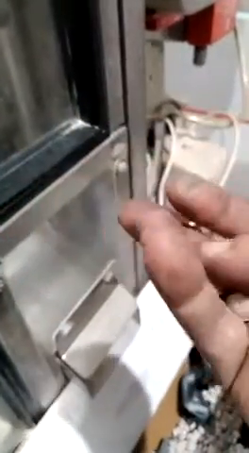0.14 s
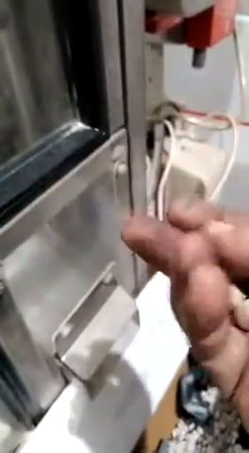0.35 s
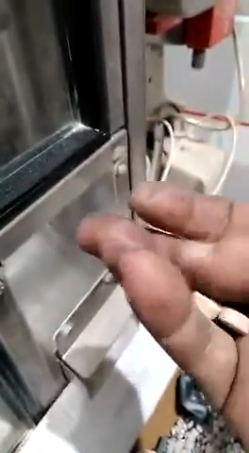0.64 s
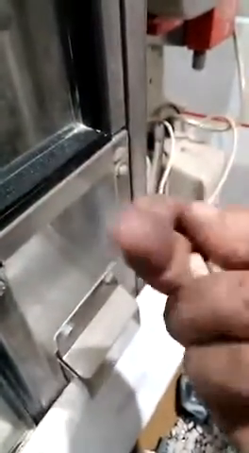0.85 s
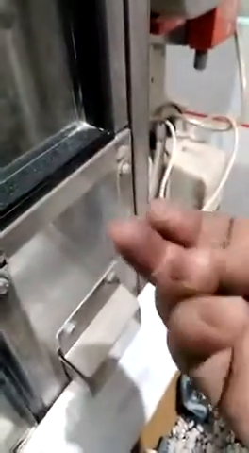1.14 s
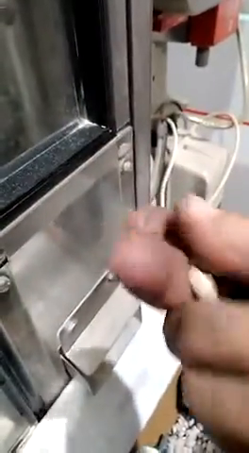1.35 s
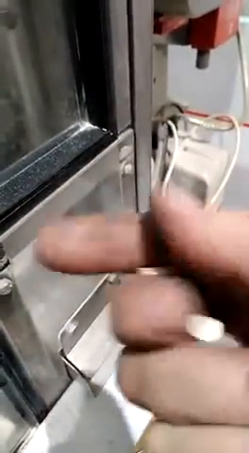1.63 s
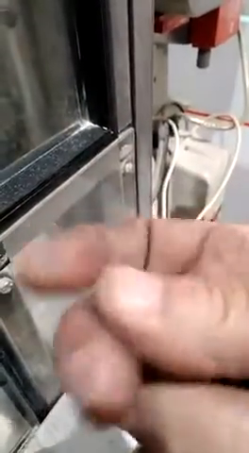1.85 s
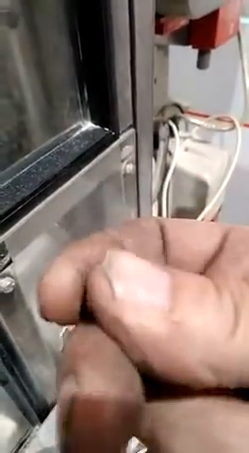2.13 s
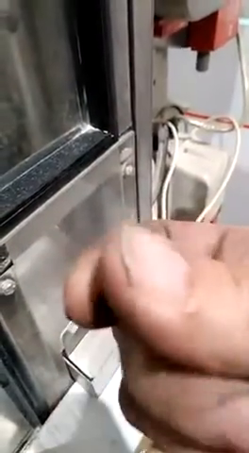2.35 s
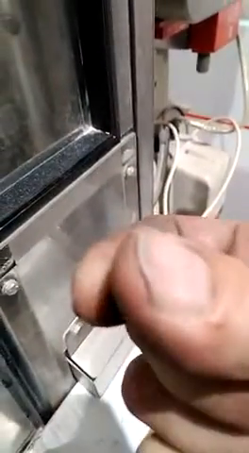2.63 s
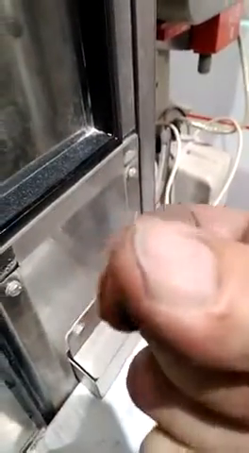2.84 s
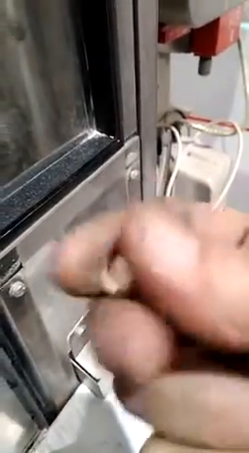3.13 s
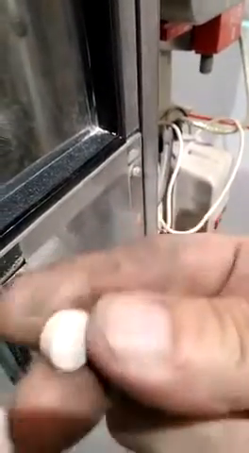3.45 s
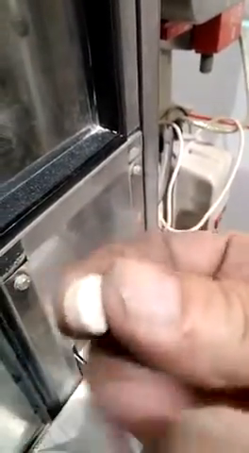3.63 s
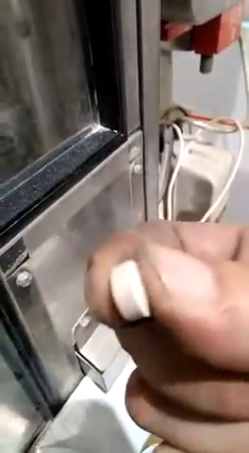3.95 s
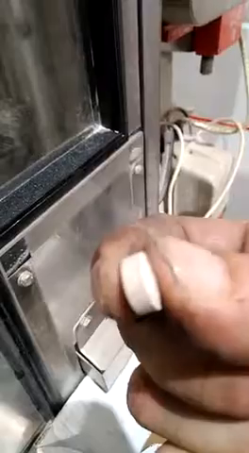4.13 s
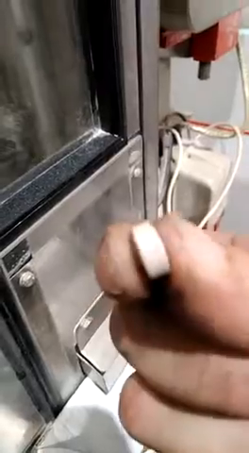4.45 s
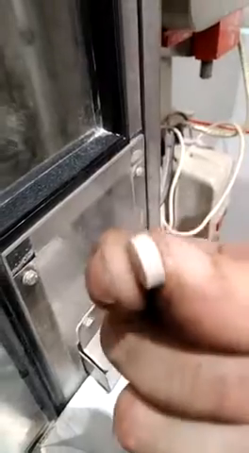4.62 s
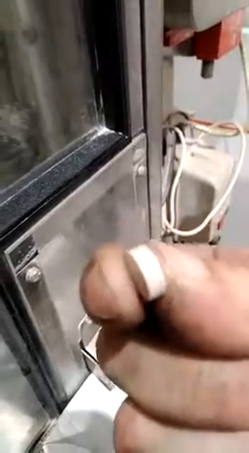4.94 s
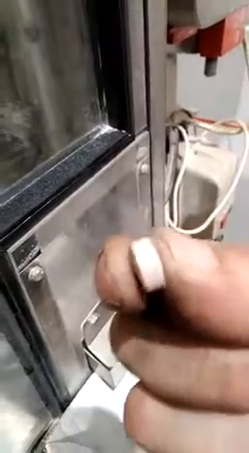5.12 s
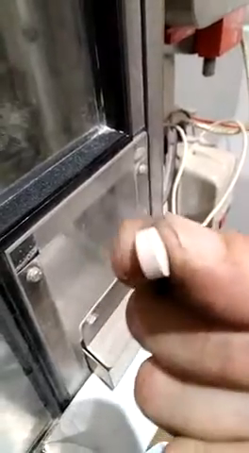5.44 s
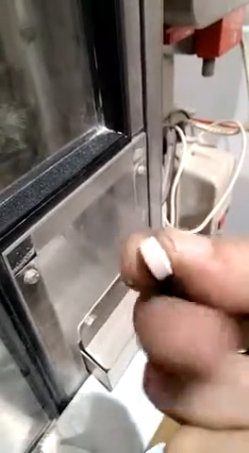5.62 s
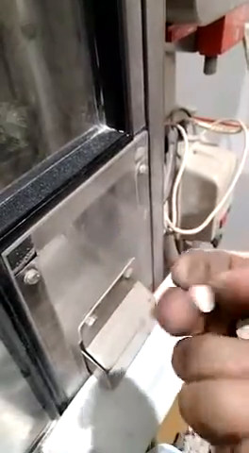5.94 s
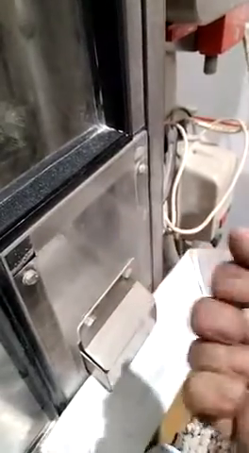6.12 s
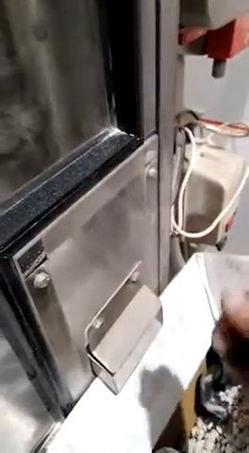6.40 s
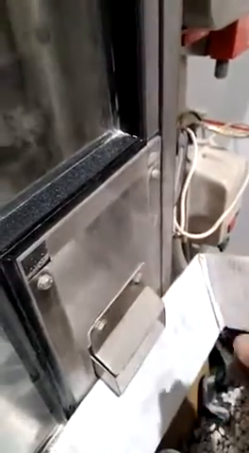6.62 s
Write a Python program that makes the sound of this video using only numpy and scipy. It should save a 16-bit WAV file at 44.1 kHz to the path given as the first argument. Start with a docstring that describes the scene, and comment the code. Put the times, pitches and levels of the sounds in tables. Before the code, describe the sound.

A small tablet-making press runs in a small, reflective room, heard from very close in stereo. At first only a low motor hum and belt-and-gear whirr, with a tiny dry tick at 0.02 s and the first soft scrape of the feed shoe. From about 0.25 s the linkage taps twice, a bright cam clack follows at 0.44, and three heavy blows land within 0.2 s around 0.56, ringing the frame at a hollow mid pitch, booming the housing and throwing loose guards into a quick fading rattle. The stroke repeats every 0.875 s, centred near 1.4, 2.3, 3.2, 4.1, 4.9, 5.8 and 6.7 s, each slightly uneven. Between strokes the shoe hisses over powder and its arm shudders dully, strongest before 2.3, 4.9 and 5.8. Hard ticks appear near 0.9, 2.6, 4.4 and 5.3. The motor continues throughout, dipping under the blows; the sound stops amid the last stroke.

```python
"""First a motor hums and whirrs and a tiny tick sounds; then a tablet press strikes every 0.875 s in a small
room. In each stroke the linkage taps four times, the cam clacks, and three heavy blows ring the frame and
rattle the guards. In between, the feed shoe shudders and scrapes over powder, and now and then something ticks.
Ringing metal is a sum of fading sine waves; scrapes, clanks and whirr are noise shaped by tone and loudness.
All of it is heard from close by, in stereo."""
import sys
import numpy as np
from scipy.fft import rfft, irfft, next_fast_len
from scipy.io import wavfile
from scipy.ndimage import map_coordinates

SR = 44100
rng = np.random.default_rng(int(sys.argv[2]) if len(sys.argv) > 2 else 0)


def generate_wav(signal):
    """Clip the signal to [-1, 1] and save it as 16-bit WAV at the path in sys.argv[1]."""
    frames = np.transpose(np.atleast_2d(signal))
    scaled = np.clip(frames, -1, 1) * 32767
    pcm = np.round(scaled).astype(np.int16)
    wavfile.write(sys.argv[1], SR, pcm)


N = 298557  # length in samples


def amp(db):
    """Turn decibels into a gain."""
    return 10 ** (np.asarray(db) / 20)


def unit(x):
    """Scale to an average strength (rms) of 1."""
    return x / np.sqrt(np.mean(x ** 2) + 1e-20)


def along(points, hz):
    """Read a curve of (f/Hz, value) points, joined by straight lines on a log frequency axis."""
    f, v = np.transpose(points)
    return np.interp(np.log(hz + 1), np.log(f + 1), v)


def wobble(rate):
    """A smooth random curve with `rate` random points a second."""
    knots = rng.standard_normal(int(N * rate / SR) + 4)
    return map_coordinates(knots, [np.arange(N) * rate / SR])


def add(track, s, sound):
    """Mix a sound into a track from time s (seconds) on."""
    part = track[..., max(round(s * SR), 0):][..., :sound.shape[-1]]
    part += sound[..., :part.shape[-1]]


# how alike the left and right sounds are before level and lag are set: f/Hz, likeness (1 = the same)
ALIKE = [(60, 0.93), (150, 1), (340, 0.94), (500, 0.47), (650, 0.6), (900, 0.15), (1300, 0.2), (4300, 0.16),
         (6000, .05)]
# how much louder the left microphone is than the right: f/Hz, level/dB
LEFT = [(60, -1), (110, 2), (200, 1.5), (380, 5), (700, 5), (1290, 3), (2380, 4.5), (4400, 5.5), (8120, 15),
        (15000, -4.5)]
# how far the right microphone lags behind the left: f/Hz, lag/rad
LAG = [(300, 3), (450, 3), (620, 1.37), (800, 0.3), (1250, 0.08), (2100, -0.5), (3400, -5.8), (4500, -8)]
RAGGED_DB = 4  # size of the random peaks and dips in the spectrum


def ringing_noise(spectrum):
    """Stereo noise of rms 1 through a dense forest of fixed resonances; the microphones oppose in the bass."""
    size = next_fast_len(N)
    hz = np.fft.rfftfreq(size, 1 / SR)
    knots = np.geomspace(20, SR / 2, num=1100)
    forest = np.interp(hz, knots, rng.standard_normal(len(knots)))
    forest *= hz / (hz + 800)  # smoother towards the bass
    shape = amp(along(spectrum, hz) + RAGGED_DB * forest)
    # a shared and an opposite part, mixed to give the wanted likeness
    turn = np.arccos(np.clip(along(ALIKE, hz), -1, 1)) / 2
    mid, side = rfft(rng.standard_normal((2, size))) * shape * [np.cos(turn), np.sin(turn)]
    lean = amp(along(LEFT, hz) / 2)
    left = (mid + side) * lean
    right = (mid - side) / lean * np.exp(-1j * along(LAG, hz))
    pair = np.array([left, right]) / np.hypot(lean, 1 / lean)
    return unit(irfft(pair, size)[:, :N])


ROOM_T60 = 0.87  # s for the room's tail to fall by 60 dB


def decays(hits, attack, room_db):
    """Loudness curve of (t/s, level/dB, t60/s) hits: each rises, dies fast and leaves a tail in the room."""
    power, t = np.zeros(N), np.arange(SR) / SR
    for s, db, t60 in hits:
        direct = amp(-60 * t / max(t60, .005)) ** 2
        tail = amp(room_db - 60 * t / ROOM_T60) ** 2
        rise = (1 - np.exp(-t / attack)) ** 2
        add(power, s, amp(db) ** 2 * (direct + tail) * rise)
    return np.sqrt(power)


def struck(table, hits, attack, scatter_db, right_db, detune):
    """Each (t/s, level/dB) hit rings a table of modes; strength, phase and pitch vary from hit to hit."""
    out, t = np.zeros((2, N)), np.arange(SR // 5) / SR
    hz, level, t60, lag = np.transpose(table)
    fade = amp(-60 * t / t60[:, None]) * (1 - np.exp(-t / attack))
    ears = np.array([np.ones(len(hz)), amp(right_db) * np.exp(-1j * lag)])
    for s, db in hits:
        size, phase, shift = rng.standard_normal((3, len(hz)))
        modes = fade * np.exp(2j * np.pi * np.outer(hz * (1 + detune * shift), t))
        strength = amp(db + level + scatter_db * size) * np.exp(.3j * phase)
        add(out, s, ((ears * strength) @ modes).imag)
    return out


# one row per turn of the crank, used by most parts below: t/s of the middle blow, then changes from the usual:
# cam clack level/dB, loose steel level/dB, shoe scrape level/dB, arm shudder level/dB
STROKES = [(.56, -2, -3, -2, -2.5), (1.435, -2, 1, -2, -3), (2.31, -2, 0, 2, 3.5),
           (3.186, 0, -1.5, -1.5, -1), (4.061, -2.5, -1, -0.5, -1), (4.937, -5, -2.5, 1.5, 3.5),
           (5.812, 1, -1.5, -2, 3), (6.687, -5.5, -2, 0, -2.5)]
UNEVEN_DB = 1  # no two strokes land quite alike


def each_stroke(pattern):
    """Repeat a pattern of knocks on every stroke, a little unevenly; gives its columns with absolute times."""
    rows = []
    for s, _, steel_db, _, _ in STROKES:
        for at, db, clank_db, chink_db, *rest in pattern:
            rows.append((s + at, db, clank_db, chink_db + steel_db, *rest))
    rows = np.array(rows)
    rows[:, 1:4] += UNEVEN_DB * rng.standard_normal((len(rows), 3))
    return rows[rows[:, 0] < N / SR].T


# tones of the motor: multiple of the shaft speed, level/dB within the hum, right against left level/dB
HUM = [(2, -14, -1), (3, 13.5, -10.5), (4, 1.5, -2), (5, 8.5, -2), (6, 5.5, -2), (7, -6, 5)]
# tone of the steady whirr of belt and gears: f/Hz, relative level/dB (per Hz)
WHIRR_SPECTRUM = [(25, -30), (50, -0.5), (85, -6.5), (150, 11), (215, 2.5), (340, 1.5), (500, -3),
                  (650, -0.5), (880, -3.5), (1100, -12), (2300, -19.5), (3200, -28), (8000, -31.5),
                  (12000, -44.5), (15000, -49)]
HUM_DB, HUM_WAVER_DB = -45.5, 1.7  # hum level and its small wavering
HUM_DIP_DB, HUM_DIP_S = 4.5, 0.14  # dip around the blows: depth and half-width


def motor():
    """Multiples of the shaft speed, slightly unsteady and weaker during the blows, over a whirr of belt and gears."""
    shaft_hz, t = 24.8, np.arange(N) / SR
    turns = np.cumsum(shaft_hz * (1 + 0.0043 * wobble(4.08))) / SR
    hum = np.zeros((2, N))
    for k, db, right_db in HUM:
        tone = np.sin(2 * np.pi * (round(k) * turns + rng.random()))
        hum += amp(db) * np.outer([1, -amp(right_db)], tone)  # the right microphone hears it upside down
    pressing = sum(np.exp(-((t - s) / HUM_DIP_S) ** 2) for s, *_ in STROKES)
    hum_db = HUM_DB - HUM_DIP_DB * pressing + HUM_WAVER_DB * wobble(16)
    whirr = amp(-25.5 + 1.95 * wobble(12)) * ringing_noise(WHIRR_SPECTRUM)
    return amp(hum_db) * hum + whirr


# scrape of the feed shoe over one stroke, out and back: t/s from the middle blow, level/dB before stroke changes
SHOE = [(-.6, -65), (-.55, -42), (-.49, -38.5), (-.44, -46.5), (-.34, -42.5), (-.26, -52.5), (-.19, -41),
        (-.13, -52.5), (.19, -45.5), (.27, -68)]
# tone of the scrape, also of loose steel in taps and blows: f/Hz, relative level/dB (per Hz)
CHINK_SPECTRUM = [(2500, -2), (4200, -0.5), (5600, 3), (8000, 3), (9700, -6.5), (12200, -18.5),
                  (14500, -20), (16000, -48)]
# dull tone of the shuddering arm, also of the thumping joints: f/Hz, relative level/dB (per Hz)
SHUDDER_SPECTRUM = [(90, -18), (200, -10), (280, 2.5), (350, -3.5), (480, -12), (620, 0.5), (850, -13),
                    (1200, -23), (2500, -29.5), (4000, -60)]
# the shoe's arm on its way back: s from the middle blow, usual level, decay in s
SHUDDER_AT_S, SHUDDER_DB, SHUDDER_T60 = -0.431, -17, 0.48


def feed_shoe():
    """The shoe slides to and fro with every stroke: powder hisses under it and its arm shudders."""
    t, (offset, scrape_db) = np.arange(N) / SR, np.transpose(SHOE)
    travel = np.zeros(N)
    for s, _, _, db, _ in STROKES:
        travel += amp(db + np.interp(t - s, offset, scrape_db, left=-np.inf, right=-np.inf))
    grain = amp(3.1 * wobble(20) + 1.46 * wobble(900))  # slow and fast roughness
    scrape = travel * grain * ringing_noise(CHINK_SPECTRUM)
    hits = [(s + SHUDDER_AT_S, SHUDDER_DB + db, SHUDDER_T60) for s, *_, db in STROKES]
    swell = decays(hits, attack=0.0093, room_db=-27)
    shudder = swell * amp(1.2 * wobble(60)) * ringing_noise(SHUDDER_SPECTRUM)
    return scrape + shudder


# small hard ticks: t/s, level/dB
TICKS = [(0.0214, -25.5), (0.8997, -19), (2.645, -26), (4.402, -20), (5.2776, -21)]
# bright tone of a tick: f/Hz, relative level/dB (per Hz)
TICK_SPECTRUM = [(800, -20), (2500, -2), (5000, -1), (8000, 11), (12000, -1.5), (15500, -3)]


def ticks():
    """A tiny dry contact: a noise burst that is gone in a few milliseconds but for a faint room tail."""
    hits = [(s, db, .016) for s, db in TICKS]
    return decays(hits, attack=0.00025, room_db=-29) * ringing_noise(TICK_SPECTRUM)


# play in the joints gives way at the same points of every stroke:
# t/s from the middle blow, thump level/dB, click level/dB, t60/s
JOINTS = [(-.216, -25.5, -37, .075), (-.202, -28.5, -41, 0.051), (-.1, -19, -21, 0.18),
          (-.071, -22.5, -31, .072), (-.042, -8.5, -25, 0.039), (.044, -28, -25, .03),
          (.086, -13.5, -21.5, .052), (.098, -19.5, -22.5, 0.13), (.338, -20, -35.5, 0.088)]
# tone of the click: f/Hz, relative level/dB (per Hz)
CLICK_SPECTRUM = [(700, -12), (1200, 6), (1750, 2), (2400, 8.5), (2900, -2.5), (3600, -10.5), (4500, -6.5),
                  (5500, -11), (8500, -24), (11000, -45)]


def joints():
    """As the load reverses, each loose joint gives a short click and a dull thump."""
    rows = [(s + at, *rest) for s, *_ in STROKES for at, *rest in JOINTS]
    s, thump_db, click_db, t60 = np.transpose(rows)
    thump = decays(zip(s, thump_db, t60), attack=0.0026, room_db=-22) * ringing_noise(SHUDDER_SPECTRUM)
    click = decays(zip(s, click_db, t60), attack=0.0011, room_db=-17) * ringing_noise(CLICK_SPECTRUM)
    return thump + click


# tone of the clack: f/Hz, relative level/dB (per Hz)
CAM_SPECTRUM = [(650, -35), (1100, -1), (1350, 0), (1840, -19), (1960, -7), (2190, -1), (3110, -7.5),
                (3320, -8), (3500, 1.5), (3910, -5), (4810, -17), (6750, -11), (9790, -17.5), (12600, -35),
                (15000, -39)]
# ringing tones of the cam: central f/Hz, relative level/dB, t60/s, lag/rad at the right microphone
CAM_MODES = [(2120, 1.5, 0.43, 1), (2205, 2.5, 0.3, -3), (3170, -2, 0.23, 0.5), (3446, 1.5, 0.26, 0),
             (3740, -5, 0.25, -1.5), (3930, -15, 0.21, -9), (6670, -8, 0.18, -1.5),
             (7300, -6.5, 0.086, -3.5), (9720, -2, 0.094, 0.5)]
# s from the middle blow, usual level, decay in s
CLACK_AT_S, CLACK_DB, CLACK_T60 = -.1215, -19, 0.25
CAM_RING_DB = -10  # the ring against the clack


def cam():
    """Just before the blows steel meets steel with a sudden bright clack and a short ring."""
    hits = [(s + CLACK_AT_S, CLACK_DB + db, CLACK_T60) for s, db, *_ in STROKES]
    ring_hits = [(s, db + CAM_RING_DB) for s, db, _ in hits]
    ring = struck(CAM_MODES, ring_hits, attack=0.0013, scatter_db=5.0, right_db=-5.5, detune=0.0029)
    clack = decays(hits, attack=0.001, room_db=-9.5) * ringing_noise(CAM_SPECTRUM)
    return ring + clack


# light taps of slack in the linkage, two before the blows and two between them; levels before stroke changes:
# t/s from the middle blow, knock level/dB, guard clank level/dB, steel chink level/dB,
# t60/s of boom, clank and chink
TAPS = [(-.307, -13, -25.5, -29.5, 0.14), (-.237, -7.5, -24.5, -38, 0.14), (-.045, -8.5, -18.5, -29, .16),
        (.043, -9, -24, -37, 0.21)]
# ringing tones of the frame, for taps and blows: central f/Hz, relative level/dB, t60/s,
# lag/rad at the right microphone
FRAME_MODES = [(338.5, -25, 0.62, 3), (398.8, -21, 0.17, 4.8), (555, -22, 0.34, 1.7),
               (600, -13.5, 0.16, 2.6), (644, -1.5, 0.12, 0.94), (691.6, -1, 0.099, 1.35),
               (763, -1.5, 0.071, 0.69), (849.6, -7.5, 0.074, 1.4), (934, -20, 0.12, 2.3),
               (1000, -17, 0.12, 0.39), (1193, -23.5, 0.25, 0.5), (1285, -18.5, 0.39, 0.72),
               (1425, -28.5, 0.34, 0.51)]
# tone of the booming housing, for taps and blows: f/Hz, relative level/dB (per Hz)
HOUSING_SPECTRUM = [(120, -42), (250, -8), (350, -4), (500, -10), (640, 4.5), (720, -9.5), (860, -1),
                    (1100, -34.5), (1500, -64)]
# tone of the clanking guards, for taps and blows: f/Hz, relative level/dB (per Hz)
GUARD_SPECTRUM = [(700, -11), (1080, -7), (1290, 11.5), (1500, -3.5), (1750, 4), (2020, -2), (2420, -2),
                  (2800, -10), (3450, -6), (4200, -15), (5000, -15.5), (7000, -36)]


def taps():
    """Slack is taken up with light knocks: frame, housing, guards and steel answer."""
    s, db, clank_db, chink_db, t60 = each_stroke(TAPS)
    ring = struck(FRAME_MODES, zip(s, db - 5.5), attack=0.0072, scatter_db=6.0, right_db=-10, detune=0.015)
    boom = decays(zip(s, db - 9, t60), attack=0.0017, room_db=-10.5) * ringing_noise(HOUSING_SPECTRUM)
    clank = decays(zip(s, clank_db, t60), attack=0.0028, room_db=-10.5) * ringing_noise(GUARD_SPECTRUM)
    chink = decays(zip(s, chink_db, t60), attack=0.002, room_db=-10.5) * ringing_noise(CHINK_SPECTRUM)
    chatter = unit(amp(0.4 * wobble(300)))
    return ring + boom + chatter * (clank + chink)


# tone of the rattling guards: f/Hz, relative level/dB (per Hz)
RATTLE_SPECTRUM = [(900, -14), (1500, -1), (2100, 6.5), (2900, -2), (4500, -7.5), (5500, -14.5),
                   (8500, -15), (11000, -40)]
RATTLE_S, RATTLE_T60 = .045, 0.028  # s: longest run, decay of one contact
RATTLE_DB, RATTLE_FALL_DB = -19.5, -6.5  # first contact, change over the longest run


def rattle(count=6):
    """The last blow of a stroke throws the loose guards into a quick run of fading contacts."""
    last_blow = BLOWS[-1][0]
    hits = []
    for s, *_ in STROKES:
        for u in (0, *rng.random(count - 1)):  # place within the run, 0 to 1
            hits.append((s + last_blow + RATTLE_S * u, RATTLE_DB + RATTLE_FALL_DB * u, RATTLE_T60))
    return decays(hits, attack=0.0005, room_db=-24.5) * ringing_noise(RATTLE_SPECTRUM)


# the three heavy blows of every stroke; levels before stroke changes: t/s from the middle blow, knock level/dB,
# guard clank level/dB, steel chink level/dB, clank t60/s, shortest t/s until the rebound
BLOWS = [(-.085, -2.5, -21.5, -25.5, 0.18, .015), (-.0005, -1, -23.5, -26, 0.27, .018),
         (.087, -3, -20, -27, 0.1, .012)]
# ringing tones of the guards: central f/Hz, relative level/dB, t60/s, lag/rad at the right microphone
GUARD_MODES = [(1640, -11, 0.28, 8), (1783, -18, 0.1, 4), (1973, 3, 0.12, 0), (1943, 2, 0.17, 1),
               (2370, -3, 0.13, -2), (2500, 2, 0.15, 2), (2880, -3.5, 0.33, -1.5), (4480, -2, 0.16, 10)]
REBOUND_SPREAD_S, REBOUND_DB = 0.00507, -10  # the parts fly apart and meet a second time
BOOM_T60, CHINK_T60 = 0.23, 0.22  # s: housing and loose steel


def blows():
    """The punch drive slams and rebounds: the frame rings, the housing booms, guards and loose steel chatter."""
    s, db, clank_db, chink_db, t60, flight = each_stroke(BLOWS)
    ring = struck(FRAME_MODES, zip(s, db), attack=0.0022, scatter_db=1.5, right_db=-6.5, detune=0.0102)
    again = s + flight + REBOUND_SPREAD_S * rng.random(len(s))
    rebound = struck(FRAME_MODES, zip(again, db + REBOUND_DB),
                     attack=0.0016, scatter_db=3.5, right_db=-7.5, detune=0.016)
    guards = struck(GUARD_MODES, zip(s, clank_db - 5),
                    attack=0.0041, scatter_db=2, right_db=-8, detune=0.008)
    boom_hits = [(at, level - 12.5, BOOM_T60) for at, level in zip(s, db)]
    boom = decays(boom_hits, attack=0.0068, room_db=-9.0) * ringing_noise(HOUSING_SPECTRUM)
    clank = decays(zip(s, clank_db, t60), attack=0.0021, room_db=-13) * ringing_noise(GUARD_SPECTRUM)
    chink_hits = [(at, level, CHINK_T60) for at, level in zip(s, chink_db)]
    chink = decays(chink_hits, attack=0.0064, room_db=-33) * ringing_noise(CHINK_SPECTRUM)
    chatter = unit(amp(2.5 * wobble(300)))
    return ring + rebound + guards + boom + chatter * (clank + chink)


def scene():
    """All parts of the press together."""
    return motor() + feed_shoe() + ticks() + joints() + cam() + taps() + rattle() + blows()


TOP_HZ = 16000  # nothing sounds above this pitch


def record(dry):
    """Rounds off the tallest peaks and leaves out everything above TOP_HZ."""
    rounded = dry / (1 + np.abs(dry) ** 8) ** (1 / 8)
    size = next_fast_len(N + SR // 2)
    in_band = np.fft.rfftfreq(size, 1 / SR) < TOP_HZ
    return irfft(rfft(rounded, size) * in_band, size)[:, :N]


dry = scene()
out = record(dry)
generate_wav(out)
```